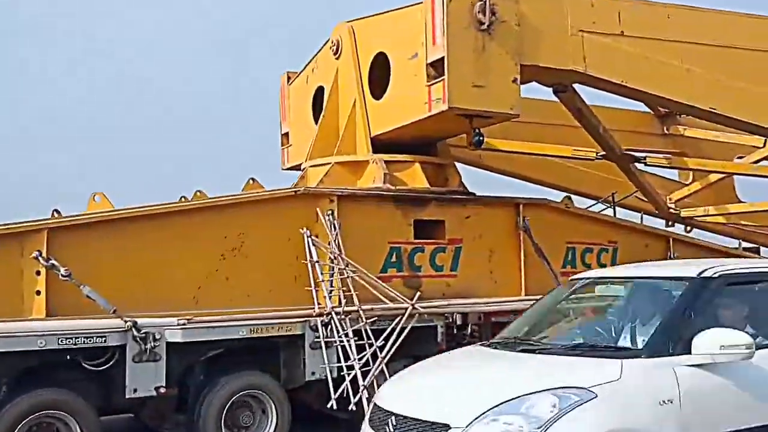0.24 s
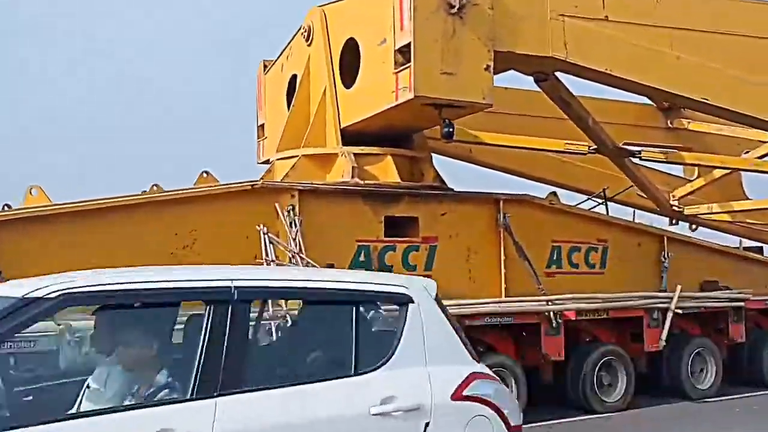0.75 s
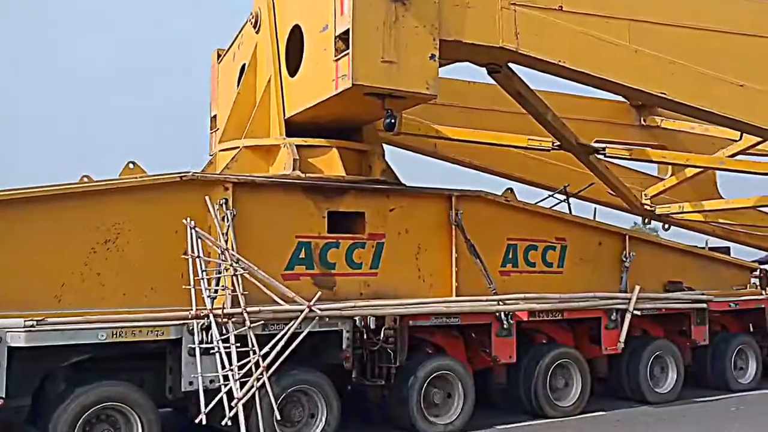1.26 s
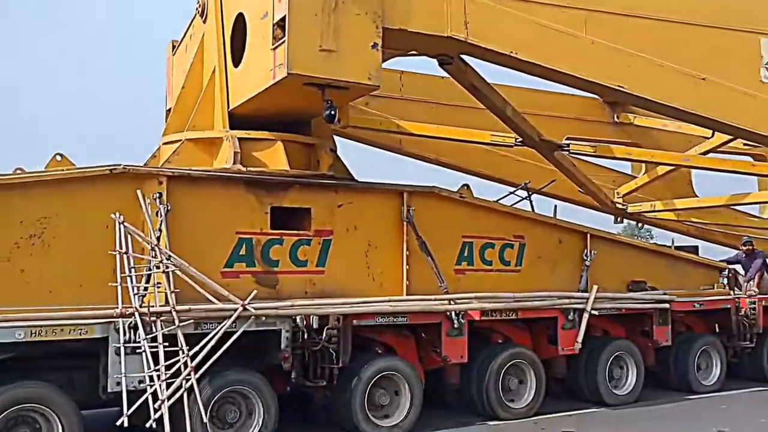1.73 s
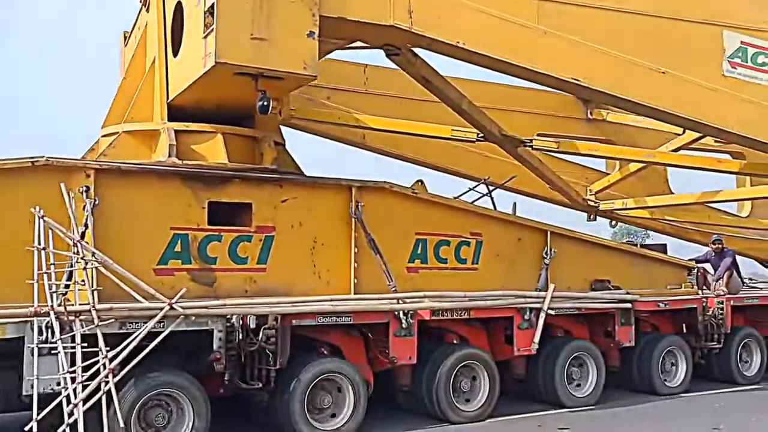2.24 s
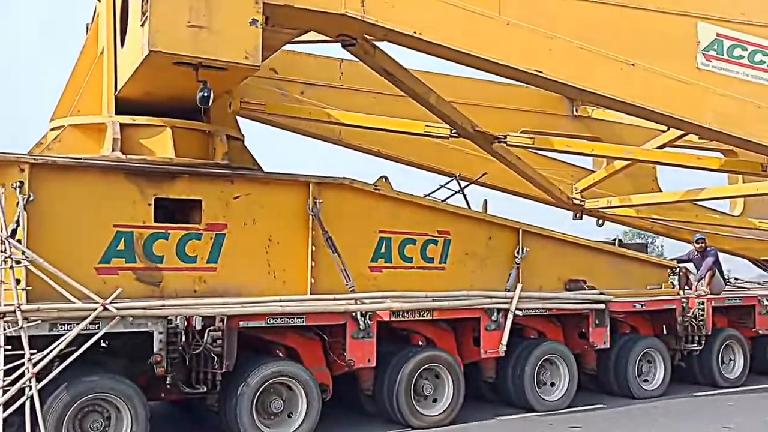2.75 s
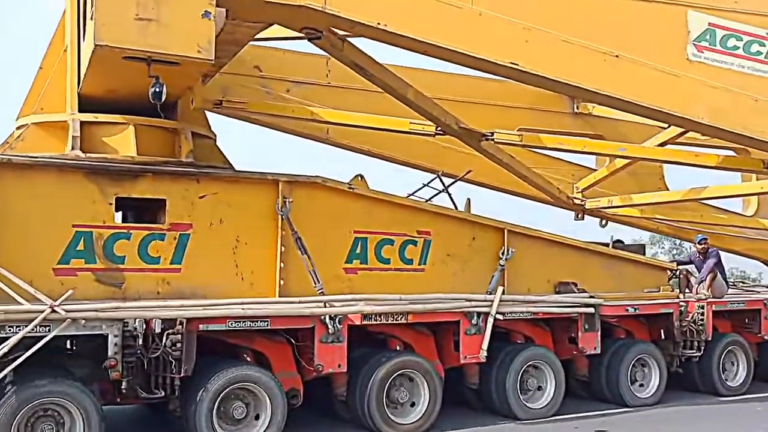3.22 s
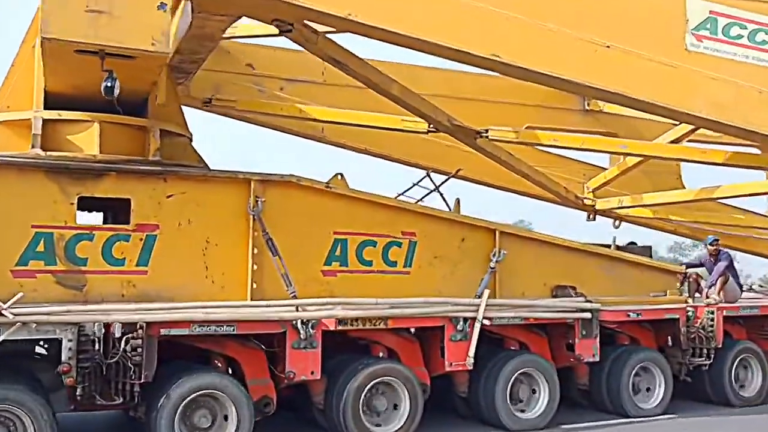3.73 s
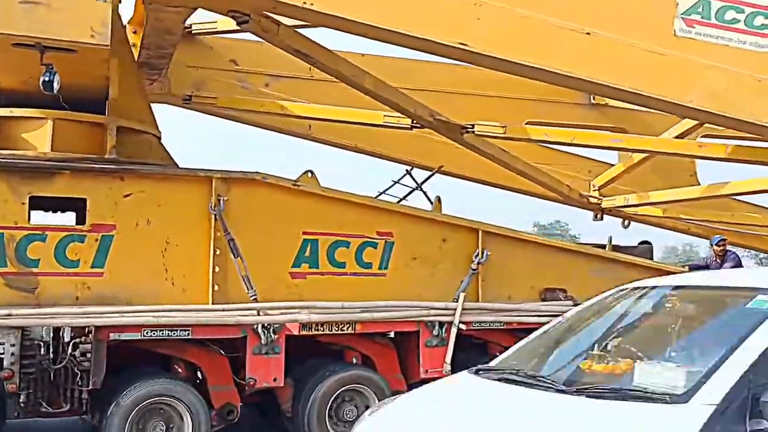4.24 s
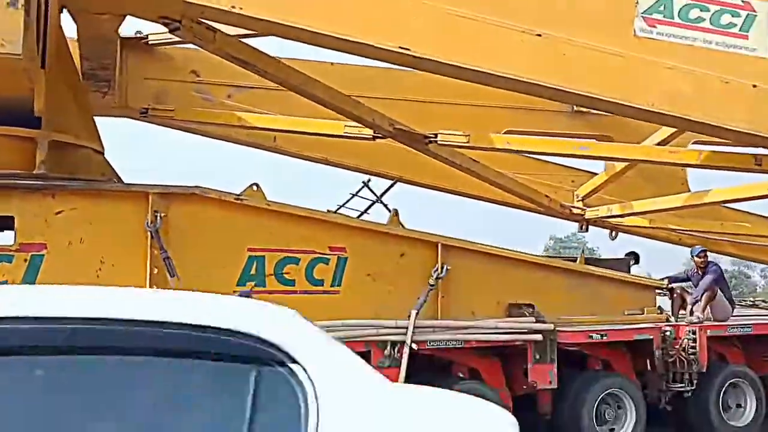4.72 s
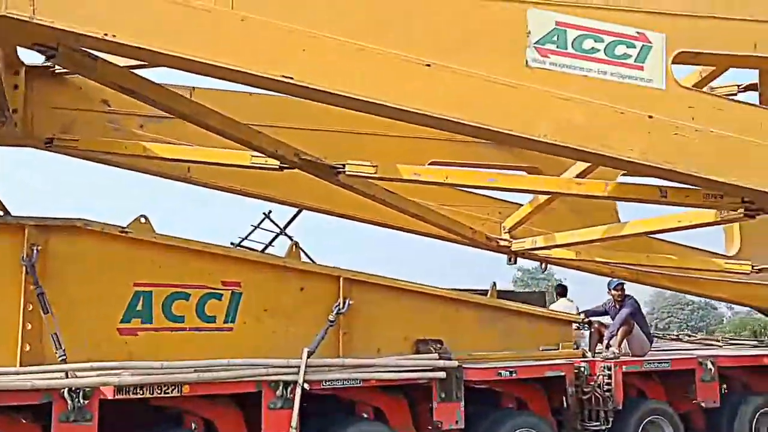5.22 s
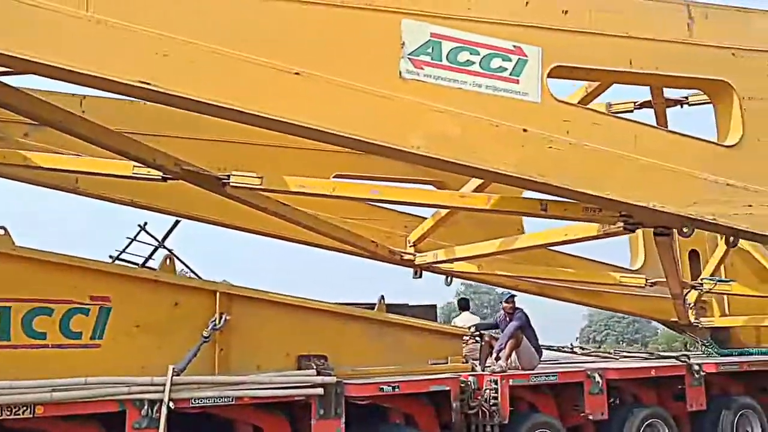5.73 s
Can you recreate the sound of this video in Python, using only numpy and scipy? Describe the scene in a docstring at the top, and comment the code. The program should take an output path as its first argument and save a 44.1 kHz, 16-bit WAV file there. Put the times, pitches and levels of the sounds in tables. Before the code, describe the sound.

Steady tyre noise and traffic rumble fill a wide outdoor stereo image for about six seconds, with two diesel engines droning and clattering underneath as a heavy trailer moves along. At about 0.3 seconds, rubbing steel gives a brief, shrill, fluttering squeal. Light clanks come near 1.8 seconds as the hauler's engine swells. At 2.2 seconds a heavy knock makes the hollow steel load boom and ring, followed by faint, high squeaks until 3 seconds. Loose fittings then clank and chatter irregularly, with sharp hits around 3.1, 3.5 and 4 seconds and ringing booms at 3.7 and 4.4. The loudest bang lands at 4.6 seconds and rings for about a second. More clanks follow at 4.9 and 5.2 seconds. The road noise dips after each loud hit and creeps back. A car's engine approaches near the end.

```python
"""Crane boom on a slow trailer.

Two diesels drone over tyre noise and passing traffic; the hauler's firings clatter, and a car nears
at the end. Loose fittings clank, chatter and ring on, rubbing steel squeals once, steel sings faintly,
the hollow load booms under heavy knocks and a dry joint squeaks. A two-port microphone widens the
stereo image; its gain control ducks the road after each loud sound."""
import sys
import numpy as np
from scipy import signal
from scipy.fft import rfft, irfft, next_fast_len
from scipy.io import wavfile
from scipy.ndimage import uniform_filter1d

SR = 44100
rng = np.random.default_rng(int(sys.argv[2]) if len(sys.argv) > 2 else 0)


def transcribe(signal):
    """Save signal, clipped to [-1, 1], as a 16-bit WAV file at the path in sys.argv[1]."""
    frames = np.atleast_2d(signal).T
    limited = np.clip(frames, -1, 1)
    pcm = np.round(limited * 32767).astype(np.int16)
    wavfile.write(sys.argv[1], SR, pcm)


N = 263310
TIME = np.arange(N) / SR

# Sound field at the ports: freq_hz, side_db, side_mid_correlation
STEREO_FIELD = [(60, 10, .85), (135, 1, 0.83), (250, -3, 0.77), (484, -5, 0.34), (990, -4, 0.71),
                (1550, 0, 0.6), (3440, 0.5, 0.8), (5070, -.5, 0.26), (10800, 1, 0.28)]
# Blows on loose fittings: start_s, level_db, tilt_db_per_octave, hollow_db, rise_s, t60_s,
# lower_favoured_hz, upper_favoured_hz, bite_db
FITTING_HITS = [(.05, -23.5, -3, 5, 0.011, 0.16, 1950, 3900, -14),
                (1.746, -22, -0.5, -10, 0.016, 0.2, 3700, 4000, -11),
                (1.816, -21, -3.5, 0, 0.0067, 0.12, 1540, 1950, -16),
                (2.672, -23, -2.5, -17, .003, 0.28, 1540, 4000, 1),
                (2.941, -21, -1, 7.5, 0.051, 0.49, 1254, 4000, -8),
                (3.018, -16.5, -4, -11, 0.008, 0.16, 1540, 4000, 5.5),
                (3.141, -8.5, -3.5, -0.5, 0.011, 0.22, 1100, 1490, -12),
                (3.542, -9.5, -2, 4, 0.0046, 0.23, 920, 1530, 7),
                (3.587, -16.5, -4, -6, 0.0017, 0.15, 1100, 1530, 7.5),
                (3.625, -17, -3, -1, 0.0026, 0.28, 1100, 1540, 7),
                (3.897, -28, -9.5, 0, 0.001, 0.06, 1100, 1330, -12),
                (3.957, -10, -2.5, -3, 0.0029, 0.17, 735, 1320, -14),
                (4.026, -14, -2, 1, 0.0036, 0.19, 1180, 1320, -19),
                (4.272, -13.5, -0.5, 2, 0.0042, 0.18, 735, 1330, -8),
                (4.612, -3.5, -3, -1, 0.0098, 0.14, 1950, 3700, 10),
                (4.786, -24, -7.5, -6, .005, 0.27, 1100, 1950, -5),
                (4.89, -15.5, -3, 6.5, 0.011, 0.41, 1540, 3000, 2),
                (5.185, -7.5, -1.5, 2.5, 0.0086, 0.26, 1254, 1510, -19.5),
                (5.265, -19, -3.5, -5, 0.005, 0.5, 1330, 1540, -10),
                (5.829, -28, 2, 15, 0.019, 0.46, 1100, 1540, -10)]


def from_db(db):
    """Decibels to gain."""
    return 10 ** (np.asarray(db) / 20)


def unit_rms(x):
    """Scale to unit power."""
    return x / np.sqrt(np.mean(x ** 2) + 1e-20)


def decay(age_s, t60_s):
    """Exponential fall, 60 dB per t60_s."""
    return np.exp(-np.log(1000) * age_s / t60_s)


def bell(hz, centre_hz, width_octaves):
    """Gaussian bump in log frequency."""
    return np.exp(-(np.log2(hz / centre_hz) / width_octaves) ** 2)


def in_time(rows):
    """Each value column of a curve at every sample."""
    time_s, *columns = np.transpose(rows)
    return [np.interp(TIME, time_s, column) for column in columns]


def at_hz(rows, hz, column=1):
    """Interpolate a column over log frequency."""
    table = np.array(rows)
    return np.interp(np.log(hz), np.log(table[:, 0]), table[:, column])


def drift(rate_hz):
    """Smooth random wander, unit power."""
    step, settle = 40, 2000
    pole = np.exp(-2 * np.pi * rate_hz * step / SR)
    white = rng.standard_normal(N // step + settle + 2)
    slow = signal.lfilter([1], [1, -2 * pole, pole * pole], white)[settle:]
    return np.interp(np.arange(N) / step, np.arange(len(slow)), unit_rms(slow))


def noise_bands(spectrum, side_db_scale=1):
    """Yield centre_hz and mid/side noise for each third octave."""
    edges_hz = 28 * 2 ** (np.arange(28) / 3)
    centres_hz = np.sqrt(edges_hz[1:] * edges_hz[:-1])
    gains = from_db(at_hz(spectrum, centres_hz)) * np.sqrt(centres_hz)
    white = rng.standard_normal((2, 2, N))
    for k, (hz, gain) in enumerate(zip(centres_hz, gains / np.linalg.norm(gains))):
        band = signal.butter(2, edges_hz[k:k + 2], "band", fs=SR, output="sos")
        mid, independent = signal.sosfilt(band, white[k % 2])
        correlation = at_hz(STEREO_FIELD, hz, column=2)
        side = correlation * mid + np.sqrt(1 - correlation ** 2) * independent
        side *= from_db(side_db_scale * at_hz(STEREO_FIELD, hz))
        yield hz, gain * unit_rms(np.array([mid, side])) / np.sqrt(2)


def resonant_noise(hz, width_hz):
    """Mid/side noise in one resonance, unit power."""
    band = signal.butter(2, [hz - width_hz / 2, hz + width_hz / 2], "band", fs=SR, output="sos")
    return unit_rms(signal.sosfilt(band, rng.standard_normal((2, N))))


def engine(hz, level_db, orders, side_gain, wobble, rough_db):
    """Exhaust pulses as a few unsteady orders; returns sound and cycle count."""
    cycles = np.cumsum(hz * (1 + wobble * drift(5.4))) / SR
    tone = sum(from_db(db + rough_db * drift(12)) * np.sin(2 * np.pi * (order * cycles + rng.random()))
               for order, db in orders)
    return np.sqrt(2) * from_db(level_db) * tone * np.array([[1], [side_gain]]), cycles


def hauler_diesel():
    """The hauler takes up load and gains speed; returns sound and firing count."""
    # Pull under load: time_s, firing_hz, level_db
    pull = [(0, 85.2, -55.5), (1.55, 84.1, -53), (1.75, 86.5, -40.5), (2.45, 86.9, -47), (3, 88.2, -46.5),
            (3.6, 89.45, -46.5), (4.2, 90.9, -42.5), (5.2, 93, -44.5), (5.97, 95, -45)]
    # Exhaust orders: firing_multiple, level_db
    orders = [(1, 2), (2, -6.5), (3, -18), (4, -16)]
    firing_hz, level_db = in_time(pull)
    return engine(firing_hz, level_db, orders, side_gain=1.9, wobble=0.0168, rough_db=2)


def second_diesel(start_hz=58.75, hz_per_s=5, leaves_s=3.6, fade_db_per_s=14):
    """A second engine speeds up steadily, then fades away."""
    # Exhaust orders: firing_multiple, level_db
    orders = [(1, -16), (2, 7.5), (3, 4)]
    level_db = -51 - fade_db_per_s * np.maximum(TIME - leaves_s, 0)
    firing_hz = start_hz + hz_per_s * TIME
    return engine(firing_hz, level_db, orders, side_gain=1, wobble=0.0045, rough_db=4)[0]


def diesel_clatter(firings, uneven_db=6, alternate_db=4):
    """Envelope of one dying burst per firing; strong and weak cylinders alternate."""
    count = firings.astype(int)
    strength_db = uneven_db * rng.uniform(-1.4, 1, size=1000)[count] + alternate_db * (count % 2)
    return unit_rms(from_db(strength_db) * np.exp(-0.94 * (firings % 1)))


def road_noise(clatter, level_db=-24.5, rumble_hz=228, roar_hz=1020, hiss_hz=3630):
    """Traffic rumble and tyre roar; diesel clatter takes a growing share toward the treble."""
    # Road spectrum: freq_hz, density_db
    spectrum = [(30, -39), (60, -3.5), (100, -4), (150, 1), (250, -3), (450, -3), (750, -6), (1500, -14),
                (2100, -10.5), (3000, -13), (4200, -16.5), (6500, -24), (9500, -22), (11500, -73)]
    # Rumble of passing traffic: time_s, level_db
    rumble = [(0, 1.5), (.22, 2), (.55, -3), (1.25, 0), (1.72, 2), (1.88, -4.5), (2.9, -0.5), (4.1, -8.5),
              (5.6, -3.5), (5.97, -2.5)]
    # Tyre roar and hiss: time_s, level_db
    tyres = [(0, 2.5), (.25, 3), (.6, -0.5), (.92, 0.5), (1.75, 1.5), (2.7, 0), (3, 1), (3.4, -2),
             (4.5, 0.5), (5.05, -1.5), (5.97, -1.5)]
    (rumble_db,), (tyres_db,) = in_time(rumble), in_time(tyres)
    out = np.zeros((2, N))
    for hz, noise in noise_bands(spectrum):
        tyre_share = at_hz([(rumble_hz, 0), (roar_hz, 1)], hz)
        clatter_share = 0.14 * at_hz([(rumble_hz, 0), (roar_hz, 0.5), (hiss_hz, 1)], hz)
        band_db = level_db + (1 - tyre_share) * rumble_db + tyre_share * tyres_db + 2 * drift(8.2)
        out += noise * from_db(band_db) * np.sqrt(1 - clatter_share + clatter_share * clatter ** 2)
    return out


def chatter(age_s, rise_s, count=4, gap_s=0.006, loss_db=3.5, crack_s=0.004):
    """Crack envelope of loose steel touching at uneven gaps, each time weaker."""
    gaps_s = gap_s * rng.uniform(0.57, 2.8, count)
    since_s = age_s - rise_s - (np.cumsum(gaps_s) - gaps_s[0])[:, None]
    gains = from_db(-loss_db * np.arange(count))[:, None]
    cracks = gains * (since_s > 0) * np.exp(-np.abs(since_s) / crack_s)
    return np.maximum(cracks.max(axis=0), age_s <= rise_s)


def twin_mode(age_s, hz, t60_s, max_split_hz=16.36, twin_db=-2.5):
    """Two close modes beat as they die; mid/side."""
    pair_hz = np.array([hz, hz + max_split_hz * rng.uniform(-0.946, 1)])
    first, twin = np.sin(2 * np.pi * (pair_hz[:, None, None] * age_s + rng.random((2, 2, 1))))
    return (first + from_db(twin_db) * twin) * decay(age_s, t60_s)


def struck_steel(hits, spectrum, modes, wash_db, pivot_hz, damping_exponent, rattle_db,
                 tail_db, tail_t60_s, side_db_scale, clang_db=0, modes_db=-14.5, favour_db=5):
    """Blows excite a dense wash of modes, dying sooner in the treble, and a few clear ones."""
    out = np.zeros((2, N))
    rattle = from_db(rattle_db * np.tanh(drift(77)))
    starts_s, level_db, tilt_db_per_octave, hollow_db, rises_s, t60s_s, lower_hz, upper_hz, _ = (
        np.transpose(hits))
    starts = np.round(starts_s * SR).astype(int)
    contacts = [chatter(TIME[:SR], rise_s) for rise_s in rises_s]

    def hit_gains(hz):
        """Gain of every blow at one frequency."""
        body_db = hollow_db * bell(hz, 970, 0.63) + clang_db * bell(hz, 1810, 0.39)
        return from_db(level_db + tilt_db_per_octave * np.log2(hz / pivot_hz) + body_db)

    for hz, noise in noise_bands(spectrum, side_db_scale):
        power = np.zeros(N)
        for at, gain, rise_s, t60_s, contact in zip(starts, hit_gains(hz), rises_s, t60s_s, contacts):
            age_s = TIME[:min(SR, N - at)]
            attack = gain * np.minimum(age_s / rise_s, 1)
            crack = from_db(-5.5) * np.sqrt(hz / 3980) * contact[:len(age_s)]
            ring = decay(age_s, t60_s / (hz / pivot_hz) ** damping_exponent)
            tail = from_db(tail_db) * decay(age_s, tail_t60_s)
            power[at:at + len(age_s)] += attack ** 2 * (crack ** 2 + ring ** 2 + tail ** 2)
        out += from_db(wash_db) * noise * np.sqrt(power) * rattle
    for hz, mode_db, t60_s in modes:
        # Each blow lands elsewhere and favours other modes.
        nearness = bell(hz, lower_hz, 0.038) + bell(hz, upper_hz, 0.038)
        scatter_db = rng.uniform(-3, 0.71, len(hits))
        gains = hit_gains(hz) * from_db(modes_db + mode_db + favour_db * nearness + scatter_db)
        mid_side = np.array([[1], [from_db(side_db_scale * at_hz(STEREO_FIELD, hz))]])
        for at, gain, rise_s in zip(starts, gains, rises_s):
            age_s = TIME[:min(int(t60_s * SR), N - at)]
            attack = gain * np.minimum(age_s / rise_s, 1)
            out[:, at:at + len(age_s)] += mid_side * attack * twin_mode(age_s, hz, t60_s)
    return out


def fitting_clanks():
    """Loose fittings strike and ring briefly."""
    # Fitting wash: freq_hz, density_db
    spectrum = [(120, -30), (250, -8), (500, -2.5), (900, -9.5), (1500, -3), (2300, 5), (3100, 2),
                (3900, 2), (5200, -3.5), (6800, -5.5), (9000, -6.5), (11500, -30)]
    # Fitting modes: freq_hz, level_db, t60_s
    modes = [(739, -8.5, 0.41), (919, -12.5, 0.72), (1086, -8, 0.36), (1184, -6.5, 0.28), (1247, -4, 0.26),
             (1314, -7.5, 0.47), (1575, -1.5, 0.28), (1956, 0, 0.23), (3002, 12.5, 0.087),
             (3350, -13, 0.11), (3730, -12, 0.089), (3990, 5, 0.1), (6600, -2.5, 0.13)]
    return struck_steel(FITTING_HITS, spectrum, modes, wash_db=1, pivot_hz=2300, damping_exponent=0.17,
                        rattle_db=2, tail_db=-29, tail_t60_s=0.6, side_db_scale=3)


def fitting_bite(centre_hz=3720, width_hz=480, spread_hz=220, fall_hz=500, fall_s=0.007, t60_s=0.14):
    """Hard contact snaps a shrill resonance that starts high and sinks to a pitch of its own."""
    power, hz = 0, centre_hz
    for start_s, level_db, _, _, rise_s, *_, bite_db in FITTING_HITS:
        age_s = np.maximum(TIME - start_s, 0)
        attack = from_db(level_db + bite_db) * np.minimum(age_s / rise_s, 1)
        power += (attack * decay(age_s, t60_s)) ** 2
        settled_hz = centre_hz + spread_hz * rng.uniform(-1, 1)
        hz = np.where(age_s > 0, settled_hz + fall_hz * np.exp(-age_s / fall_s), hz)
    phase = 2 * np.pi * np.cumsum(hz) / SR
    shrill = [drift(width_hz / 2) * np.cos(phase) + drift(width_hz / 2) * np.sin(phase)
              for _ in ("mid", "side")]
    return from_db(-11.5) * np.sqrt(power) * unit_rms(np.array(shrill))


def steel_squeal(pitch_hz=3294, sag_hz_per_s=410, jitter_hz=12, flutter_db=2.5, rasp_knee_db=-17.5):
    """Slipping steel gives a fluttering tone and hoarse overtone; a rasp takes over as they weaken."""
    # Slips of the steel: peak_s, level_db, swell_s, fade_s
    slips = [(.266, -20, 0.0032, 0.0055), (.282, -7.5, 0.0094, 0.011), (.345, -11.5, .045, .02),
             (0.379, -6, 0.016, 0.039)]
    # Rasp resonances: centre_hz, width_hz, level_db
    resonances = [(2860, 300, 2), (3065, 180, 7.5), (3305, 70, 5.5), (3415, 65, 4.5), (3590, 60, 2),
                  (3720, 120, 0)]
    power = 1e-12
    for peak_s, db, swell_s, fade_s in slips:
        age_s = TIME - peak_s
        slip = np.exp(-(age_s / np.where(age_s < 0, swell_s, fade_s)) ** 2)
        tail = (age_s > 0) * from_db(-13.5) * decay(np.abs(age_s), t60_s=0.43)
        power += from_db(db) ** 2 * (slip ** 2 + tail ** 2)
    level_db = 10 * np.log10(power)
    tone_hz = pitch_hz - sag_hz_per_s * (TIME - slips[0][0]) + jitter_hz * drift(83)
    phase = 2 * np.pi * np.cumsum(tone_hz) / SR
    flutter = from_db(flutter_db * np.tanh(drift(90)))
    tone = unit_rms(np.sin(phase) * flutter) * np.array([[1], [0.86]])
    rasp = unit_rms(sum(from_db(db) * resonant_noise(hz, width_hz) for hz, width_hz, db in resonances))
    rasp_db = -3.5 - 0.88 * np.maximum(level_db - rasp_knee_db, 0)
    overtone = resonant_noise(3 * pitch_hz, width_hz=1100)
    return from_db(level_db) * (from_db(-5.5) * tone + from_db(rasp_db) * rasp + from_db(-26) * overtone)


def steel_ringing(fade_s=0.03, flicker_db=3.5):
    """A struck fitting rings on near 1.3 kHz after two clanks; elsewhere steel sings faintly."""
    # Held resonances: start_s, end_s, pitch_hz, width_hz, level_db
    resonances = [(1.885, 2.015, 1343, 90, -29), (2.35, 3.046, 4000, 600, -36), (3.94, 4.2, 1324, 30, -37),
                  (4.266, 4.398, 1310, 30.2, -32)]
    flicker = unit_rms(from_db(flicker_db * np.tanh(drift(28))))
    out = np.zeros((2, N))
    for start_s, end_s, pitch_hz, width_hz, level_db in resonances:
        gate = np.clip(np.minimum(TIME - start_s, end_s - TIME) / fade_s, 0, 1)
        out += from_db(level_db) * gate * resonant_noise(pitch_hz, width_hz)
    return flicker * out / np.sqrt(2)


def girder_booms():
    """Heavy knocks set the hollow steel load ringing."""
    # Knocks: start_s, level_db, tilt_db_per_octave, hollow_db, rise_s, t60_s,
    # lower_favoured_hz, upper_favoured_hz, clang_db
    knocks = [(1.888, -27, 7, 5.5, .002, 0.67, 1096, 1397, 0.5),
              (2.221, -3.5, 0.7, -2, 0.0063, 1.05, 678, 1045, -1),
              (3.693, -9.5, 1.8, -1.5, 0.0064, 0.9, 1104, 1249, -8),
              (3.712, -10.5, -3, -4, 0.0067, 0.76, 610, 1045, -5),
              (4.360, -10.5, -2.5, -2, 0.007, 0.8, 580, 1340, 2),
              (4.375, -12, -0.5, -4, 0.0046, 0.62, 1075, 1874, 4.5),
              (4.611, 2, 2, -5, 0.0081, 1.37, 652, 1830, 1), (5.187, -23, 1, -1, 0.0098, .8, 1220, 1574, 9),
              (5.29, -22.5, 7, 5, 0.025, 1.47, 1340, 1593, -5)]
    # Girder wash: freq_hz, density_db
    spectrum = [(120, -25), (250, -7.5), (420, -7), (620, -1.5), (850, -4), (1150, -0.5), (1800, -5.5),
                (2300, -1), (3000, -8.5), (4200, -14), (6000, -20.5), (10000, -38)]
    # Girder modes: freq_hz, level_db, t60_s
    modes = [(237.6, -11, 1.9), (325.5, -10, 0.87), (381, -11, .8), (563, -8, 1), (594, 3.5, 0.71),
             (608, 0, 0.58), (645, -6, 2), (675, -6.5, 1.87), (744, -5, 1.2), (815, -3.5, 0.44),
             (850, 2.5, 0.25), (959, -3, 0.54), (1050, -8, 0.52), (1075, 1, 0.78), (1108, 0, 0.83),
             (1140, -1, 0.56), (1172, -3, 0.38), (1230, -3, 0.75), (1267, -5, 0.79), (1328, -5, 0.67),
             (1400, 2, 0.46), (1435, -6.5, 0.84), (1493, -7.5, 0.69), (1570, -3.5, 0.45),
             (1700, -5.5, 0.69), (1680, -12, .55), (1805, -6.5, 0.98), (1836, -4.5, 0.74),
             (1910, -5.5, 0.76), (2920, -12, 1.3), (3850, -24.5, 2.2)]
    return struck_steel(knocks, spectrum, modes, wash_db=-3, pivot_hz=1170, damping_exponent=0.38,
                        rattle_db=1.5, tail_db=-27, tail_t60_s=0.96, side_db_scale=3.1,
                        clang_db=np.transpose(knocks)[-1])


def joint_squeaks(pitch_hz=3995, jitter_hz=90, half_length_s=0.0053):
    """A dry joint slips in short, scratchy chirps around one pitch."""
    # Slips of the joint: peak_s, level_db
    slips = [(2.448, -31), (2.483, -26.5), (2.585, -33), (2.72, -31), (2.75, -27.5), (2.852, -27),
             (2.887, -27), (2.955, -30)]
    envelope = sum(from_db(db) * np.exp(-((TIME - peak_s) / half_length_s) ** 2) for peak_s, db in slips)
    phase = 2 * np.pi * np.cumsum(pitch_hz + jitter_hz * drift(120)) / SR
    return envelope * np.array([np.sin(phase), np.cos(phase)])


def approaching_car(cycle_hz=25.3, arrives_s=5.88, growth_db_per_s=29):
    """A car's engine grows louder as it nears."""
    # Exhaust orders: cycle_multiple, level_db
    orders = [(6, 3.5), (7, 1), (8, 1), (9, 3), (16, -22), (23, 2)]
    level_db = -40.5 - growth_db_per_s * np.maximum(arrives_s - TIME, 0)
    return engine(cycle_hz, level_db, orders, side_gain=0.11, wobble=0.0143, rough_db=2.5)[0]


def side_lead(side):
    """Low sound from one side reaches the ports out of step, so side leads mid."""
    # Side phase: freq_hz, lead_rad
    lead = [(10, 0), (60, 1.05), (140, .75), (250, .5), (450, .7), (700, .8), (1200, 0)]
    size = next_fast_len(N + SR // 10)
    hz = np.arange(size // 2 + 1) * SR / size
    return irfft(rfft(side, size) * np.exp(1j * at_hz(lead, hz + 1)), size)[:N]


def widen(stereo):
    """Each port has the other subtracted, a port distance later, which widens and combs the sound."""
    # Port crossfeed: freq_hz, share, delay_s
    crossfeed = [(250, 0, .0004), (600, .45, .0004), (1100, .96, .0004), (2470, .97, .000405),
                 (3730, .88, .000403), (5020, .78, .000398), (6220, .8, .000402), (7680, .92, .00039),
                 (8970, .95, .00039), (10100, .97, .000395)]
    size = next_fast_len(N + SR // 10)
    hz = np.arange(size // 2 + 1) * SR / size
    share, delay_s = at_hz(crossfeed, hz + 1), at_hz(crossfeed, hz + 1, column=2)
    ports = rfft(stereo, size)
    opposite = np.exp(-2j * np.pi * hz * delay_s) * ports[::-1]
    return irfft((ports - share * opposite) / np.sqrt(1 + share ** 2), size)[:, :N]


def gain_control(x, threshold_db=-15, share=0.79, attack_s=0.012, recovery_db_per_s=9.5, ceiling=0.88):
    """Loud sounds push the gain down fast and it creeps back; overshoot is clipped."""
    window = int(attack_s * SR)
    power = np.maximum(uniform_filter1d(x ** 2, window).max(axis=0), 1e-12)
    excess_db = np.maximum(10 * np.log10(power) - threshold_db, 0)
    recovered_db = recovery_db_per_s * TIME
    duck_db = np.maximum.accumulate(share * excess_db + recovered_db) - recovered_db
    return np.clip(x * from_db(uniform_filter1d(-duck_db, window)), -ceiling, ceiling)


def scene():
    """Sum the sources as mid/side; return left/right."""
    hauler, firings = hauler_diesel()
    engines = hauler + second_diesel() + approaching_car()
    blows = girder_booms() + fitting_clanks()
    road = road_noise(diesel_clatter(firings))
    mid, side = engines + road + blows + fitting_bite() + joint_squeaks() + steel_squeal() + steel_ringing()
    side = side_lead(side)
    return np.array([mid + side, mid - side])


def record(dry):
    """Two-port microphone: widening, gain control, steep treble cut."""
    cutoff_hz = 11600
    lowpass = signal.ellip(10, 0.1, 90, cutoff_hz, fs=SR, output="sos")
    return signal.sosfilt(lowpass, gain_control(widen(dry)))


dry = scene()
out = record(dry)
transcribe(out)
```